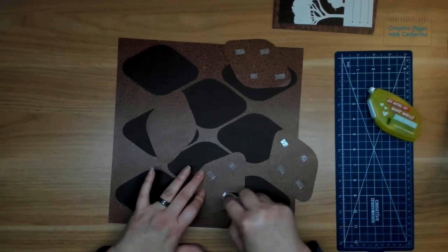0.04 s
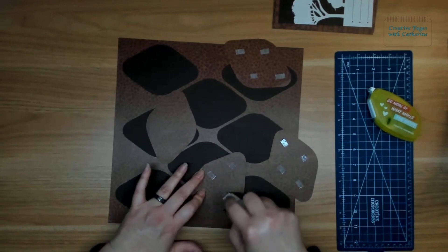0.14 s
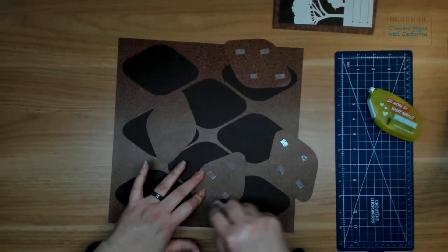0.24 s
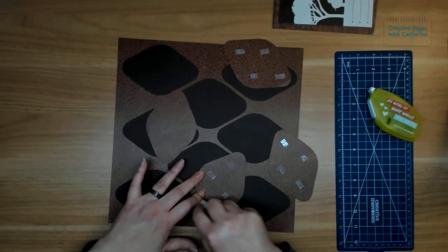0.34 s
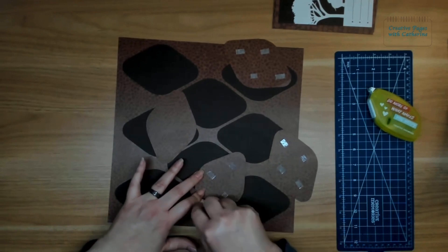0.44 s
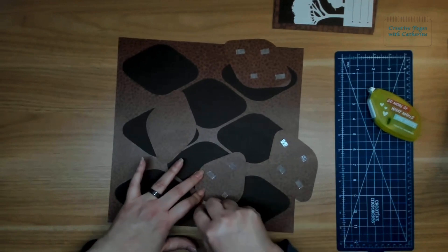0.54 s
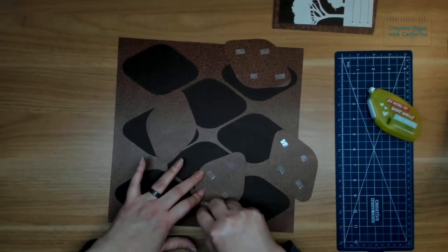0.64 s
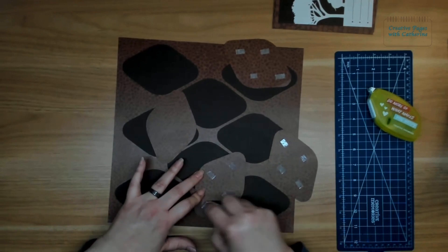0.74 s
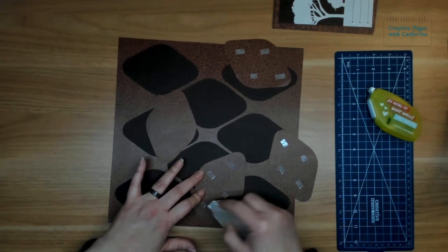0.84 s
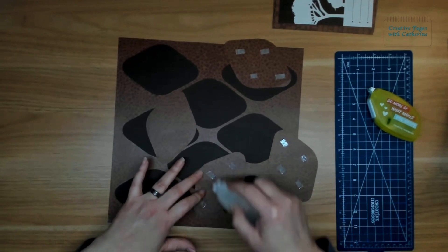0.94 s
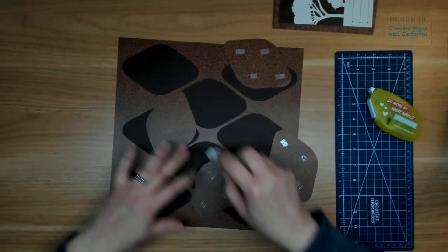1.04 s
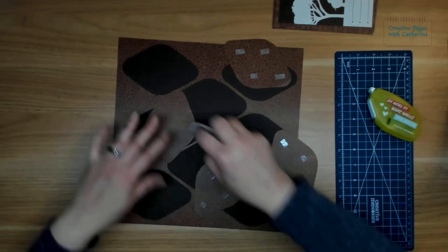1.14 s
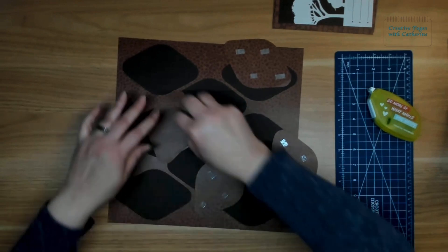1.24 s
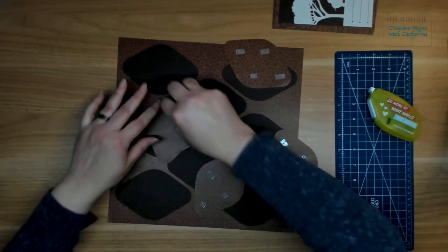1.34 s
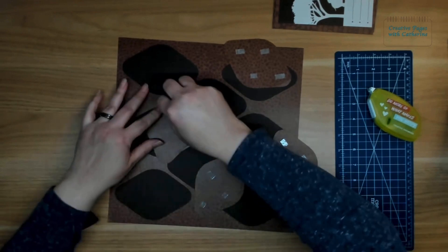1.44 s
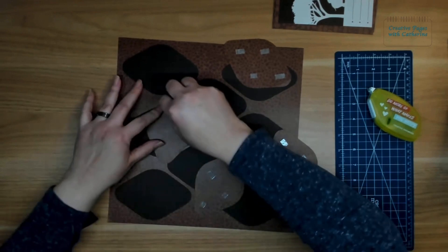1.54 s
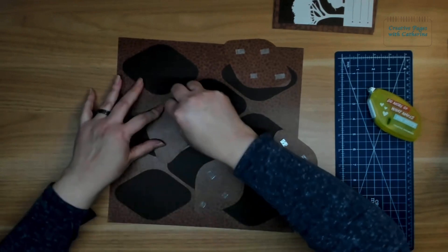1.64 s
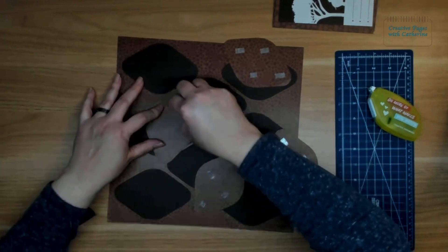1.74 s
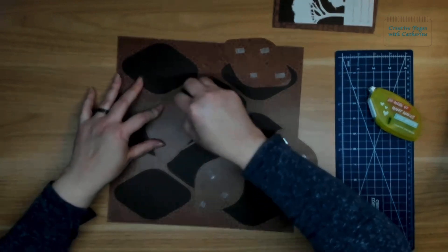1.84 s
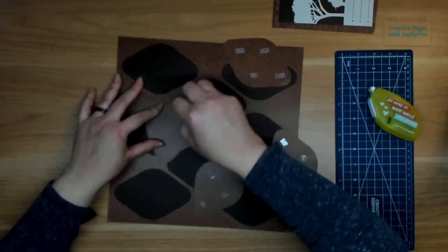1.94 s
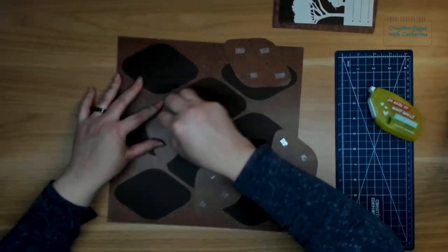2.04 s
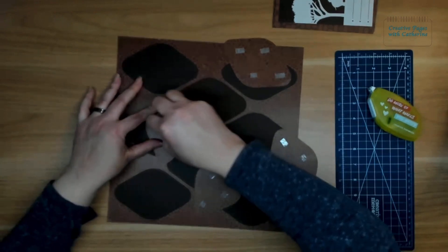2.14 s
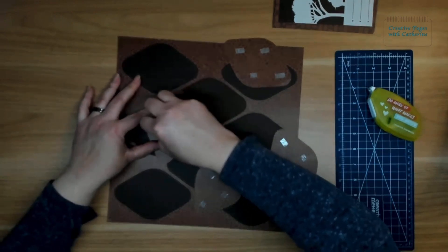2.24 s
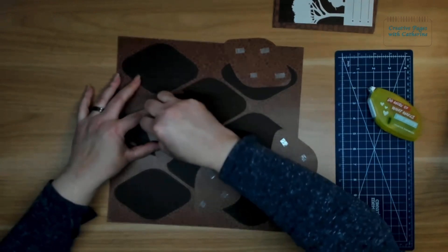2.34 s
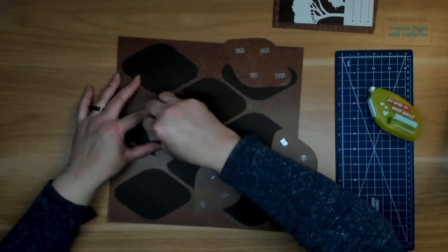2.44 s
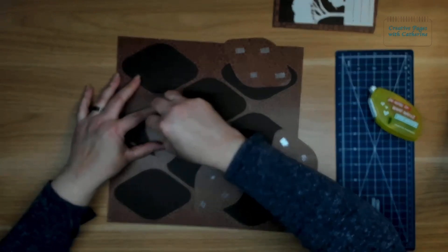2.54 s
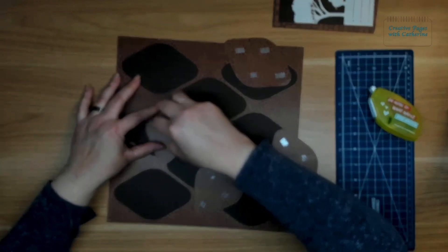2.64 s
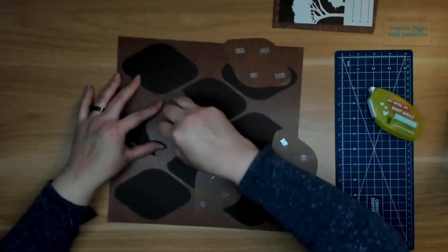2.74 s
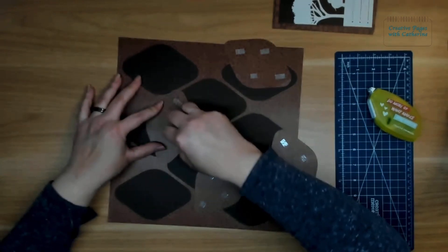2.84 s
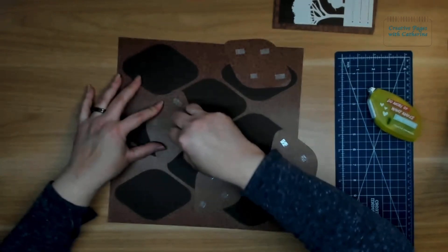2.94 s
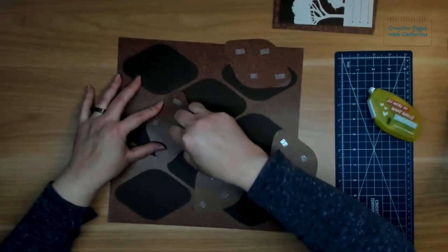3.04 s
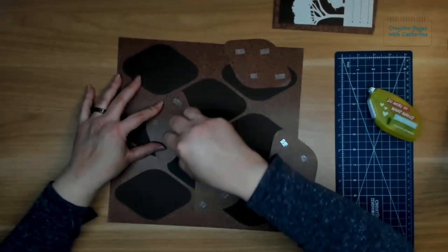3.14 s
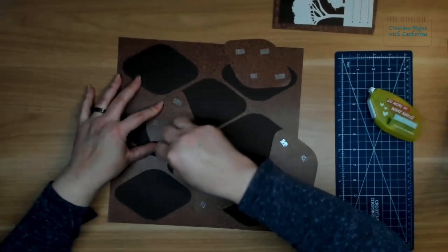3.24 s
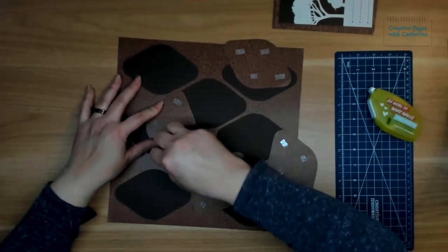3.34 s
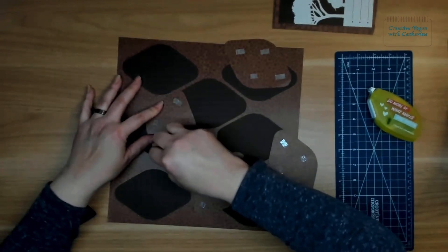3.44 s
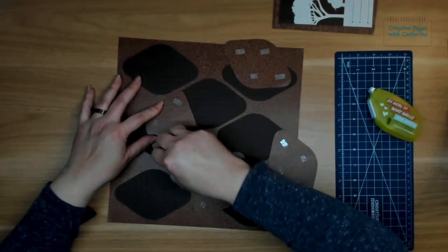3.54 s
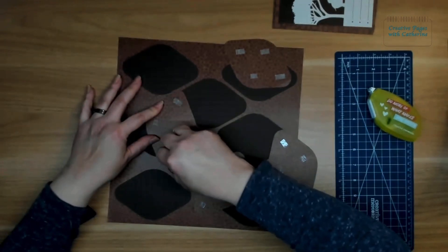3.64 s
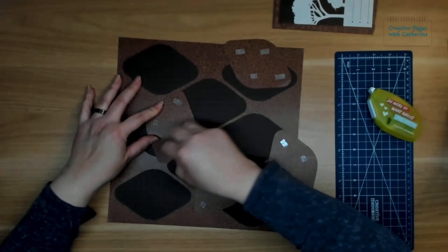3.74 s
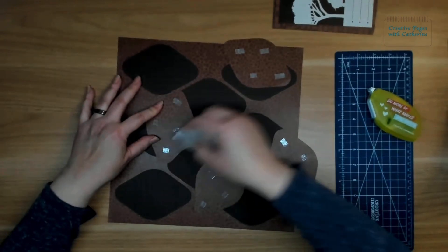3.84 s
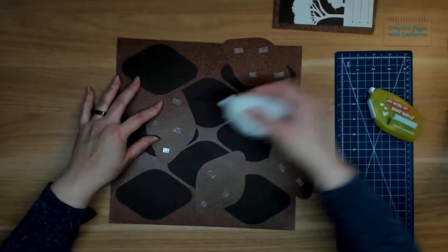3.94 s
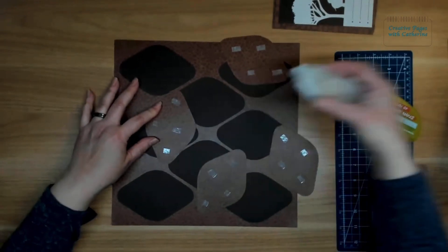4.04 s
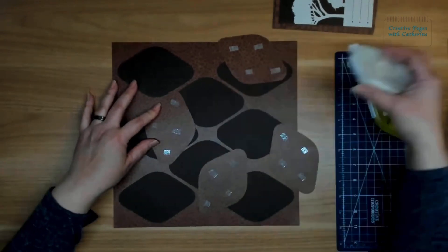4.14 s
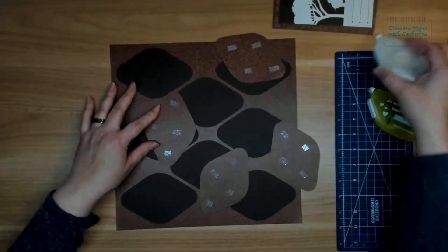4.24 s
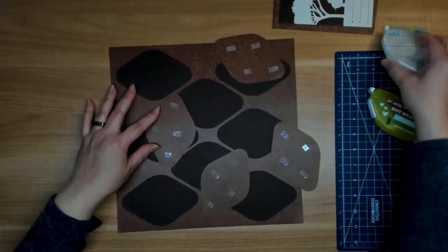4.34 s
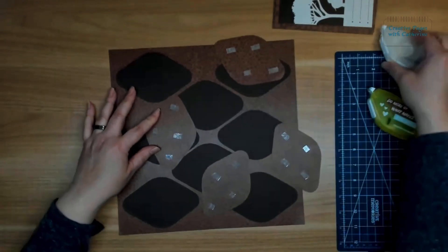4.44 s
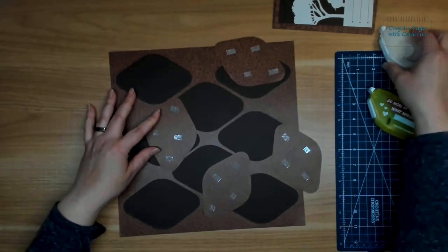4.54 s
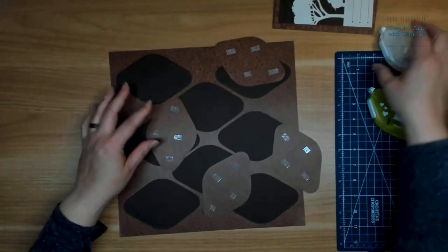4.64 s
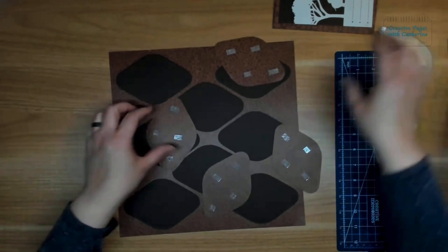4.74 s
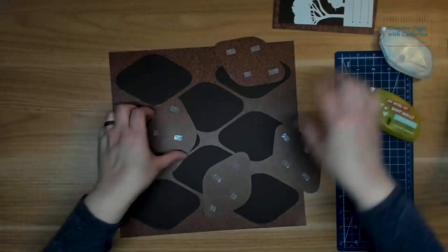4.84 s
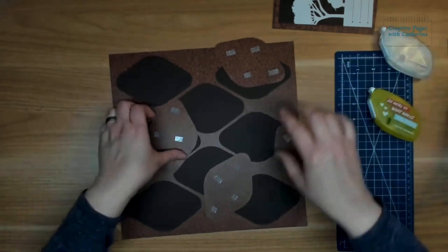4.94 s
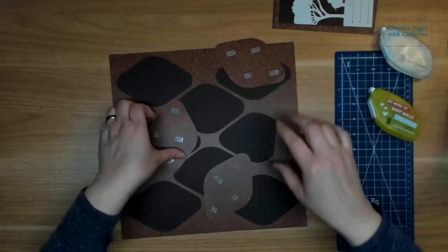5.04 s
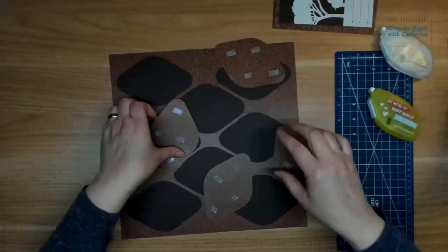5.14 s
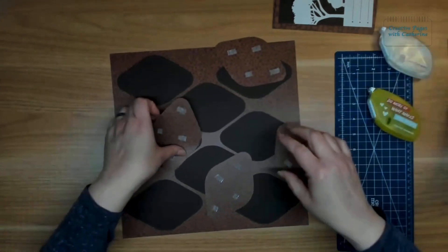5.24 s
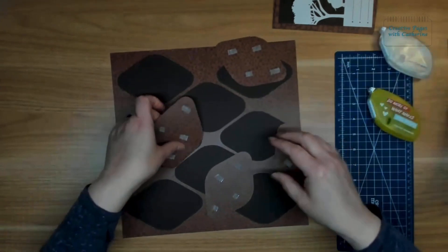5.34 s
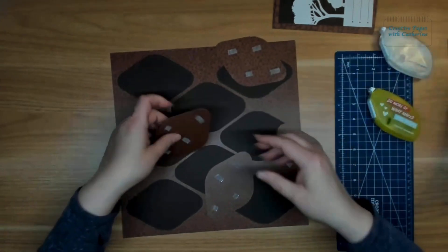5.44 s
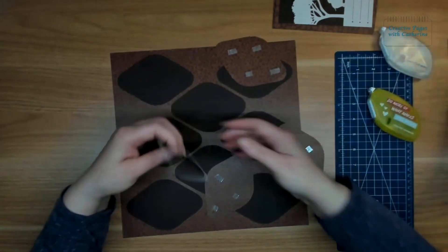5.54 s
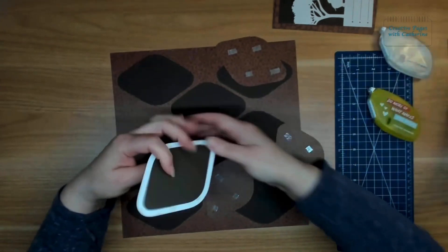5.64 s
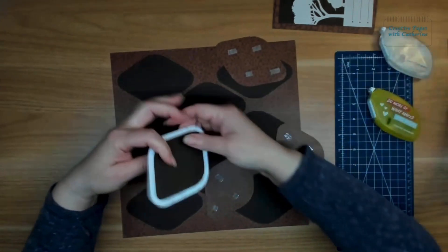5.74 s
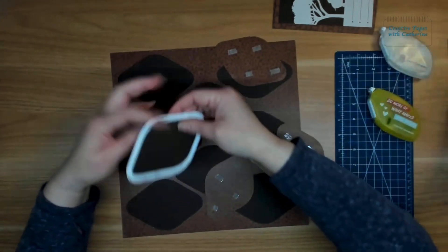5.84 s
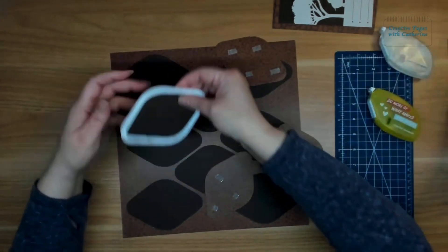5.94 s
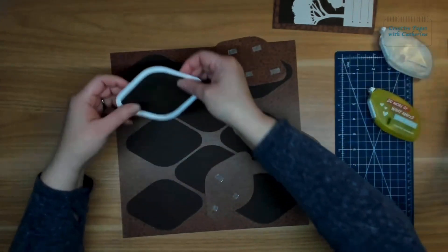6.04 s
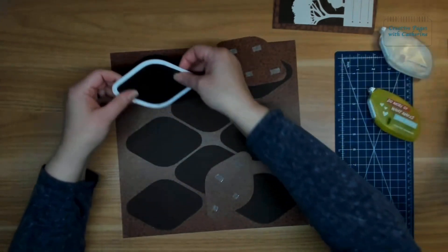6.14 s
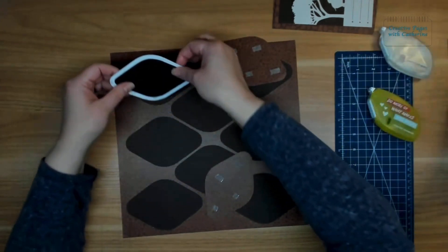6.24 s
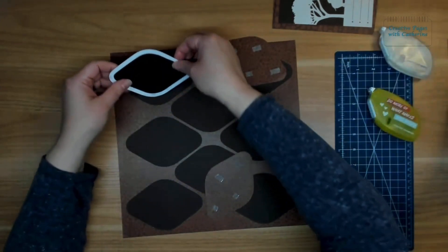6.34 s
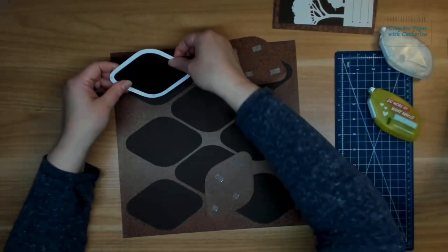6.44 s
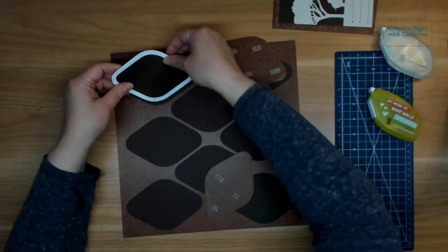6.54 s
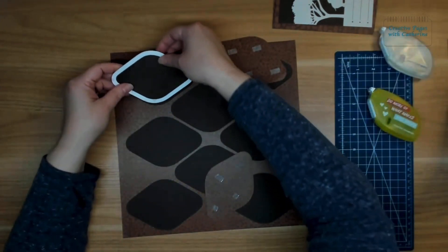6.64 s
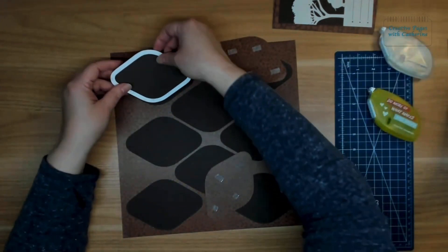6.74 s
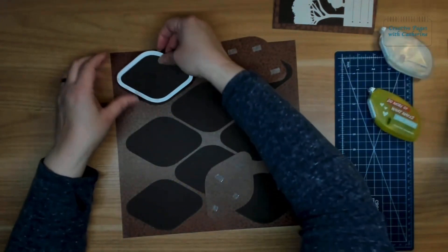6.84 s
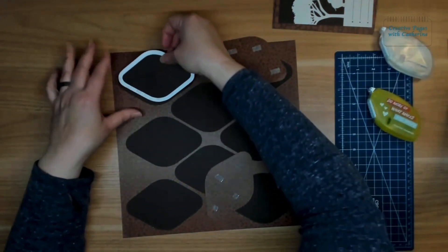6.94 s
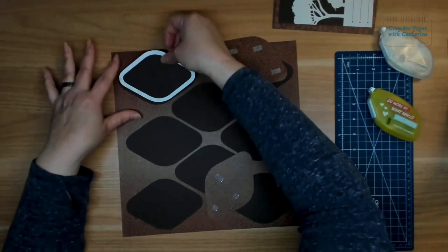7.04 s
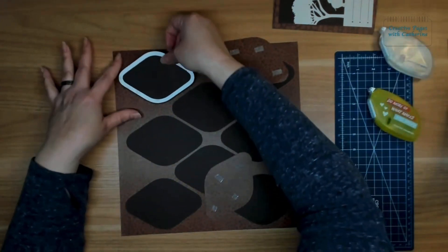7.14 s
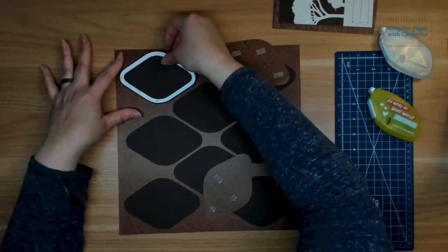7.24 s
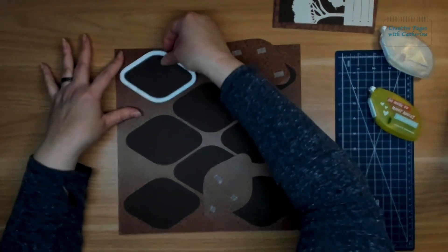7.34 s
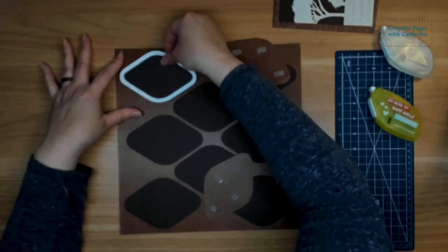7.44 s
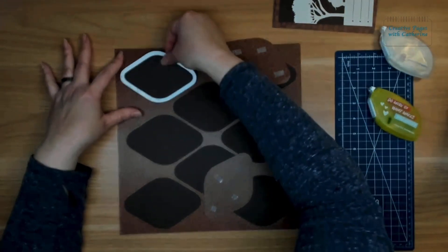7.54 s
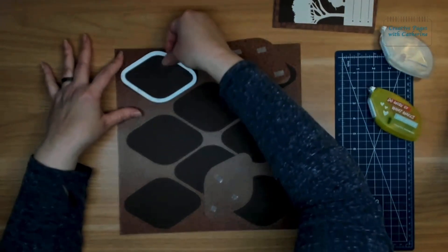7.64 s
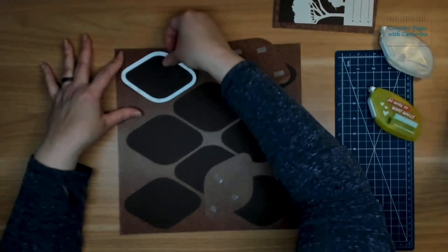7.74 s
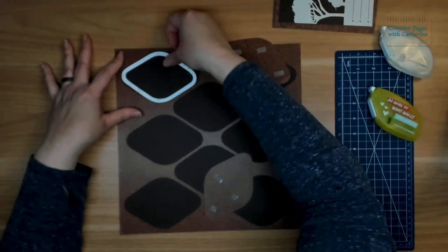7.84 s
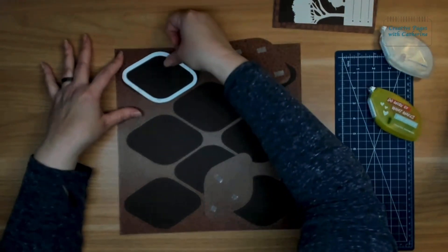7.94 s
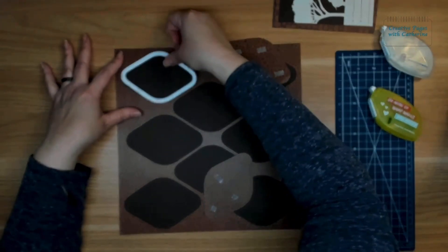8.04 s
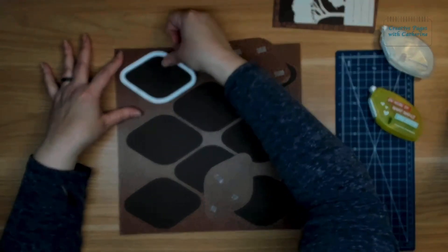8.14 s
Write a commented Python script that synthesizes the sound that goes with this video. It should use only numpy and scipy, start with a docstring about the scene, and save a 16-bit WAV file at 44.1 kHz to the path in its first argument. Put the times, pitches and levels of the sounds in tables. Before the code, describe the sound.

Brief grainy tape-pull rasps with tiny ratchet clicks and low table knocks, then a clattering put-down and a few crisp card ticks over soft hiss.

```python
"""A tape runner is pressed on card and pulled in short strokes on a hollow wooden table, then put aside.
Ratchet teeth, knocks and grainy peeling tape ring the modes of its plastic housing.
Each landing thumps the modes of the table top; sliding friction keeps them humming.
Card edges tick as decaying crackle bursts, and flexing card rustles as clumped grains in its own bands.
A background hiss of coloured noise lies beneath."""
import sys
import numpy as np
from scipy import signal
from scipy.fft import rfft, irfft, next_fast_len
from scipy.io import wavfile
from scipy.ndimage import uniform_filter1d

SR = 44100
rng = np.random.default_rng(int(sys.argv[2]) if len(sys.argv) > 2 else 0)


def dump_mix(stems):
    """Bounce the given channels to the path in sys.argv[1] as a 16-bit WAV at rate SR."""
    frames = np.atleast_2d(stems).T  # one column per channel
    limited = np.clip(frames, -1, 1)  # hard clip at full scale
    pcm = np.round(limited * 32767).astype(np.int16)
    wavfile.write(sys.argv[1], SR, pcm)


N = 361619

# table-top modes: f/Hz, level/dB, group (0 lower, 1 top, 2 upper)
TABLE_MODES = [(57.4, -11.5, 0), (98, -2.5, 0), (127.6, 2.5, 0), (178.2, 1.5, 1), (217.2, -16.5, 1),
               (299, -0.5, 2), (363, -3, 2), (460.4, -10.5, 2), (573, -19, 2)]
# pulls: t of full level/s, rise/s, hold/s, fall/s, peel/dB, treble/dB re peel, middle modes/dB re peel,
# low, middle, high modes/dB re tooth, roller drag/dB, its lower table modes/dB re top
PULLS = [(0.517, 0.046, 0.061, 0.054, -33, 5, 6.5, -3, -5, -6, -34, 0),
         (1.639, 0.13, 0.031, 0.091, -25.5, 0, 5, -12.5, -6, 0, -27.5, -9),
         (2.411, 0.059, 0.069, 0.095, -31, 2.5, -6, -0.5, -12, -14, -36.5, -4.5),
         (2.846, 0.043, 0.084, 0.047, -26, 0, -4, -6, -16, -2.5, -23.5, -15.5),
         (3.551, 0.042, 0.047, 0.055, -23.5, -2.5, 1.5, -8, -12, 0.5, -26.5, -8.5)]
# peeling tape spectrum: f/Hz, relative density/dB per Hz
PEEL_SPECTRUM = [(500, -30), (900, -38), (1800, -16), (3900, -14.5), (5500, -7.5), (7000, -5), (7800, -20),
                 (8300, -9.5), (12000, -13), (16000, -18.5)]


def amp(db):
    """dB to gain."""
    return 10 ** (np.asarray(db) / 20)


def rms_one(x):
    """Scale to rms 1."""
    return x / np.sqrt(np.mean(x ** 2) + 1e-20)


def coloured(spectrum):
    """Noise with the given spectrum, rms 1."""
    hz, db = np.transpose(spectrum)
    size = next_fast_len(N)
    grid_hz = np.maximum(np.fft.rfftfreq(size, 1 / SR), 1)
    gain = amp(np.interp(np.log(grid_hz), np.log(hz), db))
    return rms_one(irfft(rfft(rng.standard_normal(size)) * gain, size)[:N])


def flicker(cutoff_hz):
    """Low-passed noise, rms 1."""
    lowpass = signal.butter(2, cutoff_hz, fs=SR, output="sos")
    return rms_one(signal.sosfilt(lowpass, rng.standard_normal(N)))


def add(out, t_s, piece):
    """Mix a piece in at t_s."""
    i = round(t_s * SR)
    out[i:i + len(piece)] += piece[:N - i]


def resonance(x, hz, width_hz):
    """A ringing mode with steep skirts, which also lower the height of a click."""
    r, w = np.exp(-np.pi * width_hz / SR), 2 * np.pi * hz / SR
    skirt = signal.butter(2, [hz / 1.2, hz * 1.2], "band", fs=SR)
    ringing = signal.lfilter([.5, 0, -.5], [1, -2 * r * np.cos(w), r * r], x + 1e-18)
    return signal.lfilter(*skirt, ringing)


def swell(t_s, rise_s, hold_s, fall_s):
    """dB below the top of a gesture that rises up to t_s, holds and falls."""
    depth_db, bend = 31, 1.19  # drop over one rise or fall time; rounding
    t = np.arange(N) / SR
    away = np.maximum((t_s - t) / rise_s, (t - t_s - hold_s) / fall_s)
    return -depth_db * np.clip(away, 0, 9) ** bend


def gestures(rows):
    """Level of several gestures, and of a part that each holds in its own share."""
    levels = [amp(db + swell(*times)) for *times, db, _ in rows]
    return sum(levels), sum(level * amp(row[-1]) for level, row in zip(levels, rows))


def hiss():
    """Steady background hiss, wavering a little; its level rises by a few dB near each pull."""
    # noise spectrum: f/Hz, relative density/dB per Hz
    hiss_spectrum = [(20, -9), (55, -18), (85, -4), (185, -3.5), (260, -5), (300, -6.5), (400, -7.5),
                     (860, -10.5), (1230, -12.5), (6050, -19), (7800, -23), (8300, -14), (11600, -11.5),
                     (16000, -14.5)]
    # noise level before trim: t/s, level/dB
    hiss_level = [(0.0, -50.5), (0.25, -57), (4.7, -54.5), (6.4, -56.5), (8.2, -56.5)]
    bump_db, bump_s = 2.5, 0.16
    t = np.arange(N) / SR
    t_s, db = np.transpose(hiss_level)
    bumps = sum(np.exp(-((t - at - hold - fall) / bump_s) ** 2) for at, _, hold, fall, *_ in PULLS)
    level_db = np.interp(t, t_s, db) + bump_db * bumps + 3.0 + 0.57 * flicker(26)
    return amp(level_db) * coloured(hiss_spectrum)


def room(x):
    """A dense tail of dying noise, duller than the direct sound."""
    t60_s = 0.075
    t = np.arange(SR // 2) / SR
    tail = rng.standard_normal(len(t)) * amp(-60 * t / t60_s) * (t > .004)
    tail = signal.lfilter([.6], [1, -.4], tail)
    return signal.fftconvolve(x, tail / np.sqrt(np.sum(tail ** 2)))[:N]


def rustle():
    """Card flexing between the fingers: clumped tiny crackles ring the card's own bands."""
    # flexes: t of full level/s, rise/s, hold/s, fall/s, level/dB, low creak/dB re level
    flexes = [(5.372, 0.037, .005, 0.16, -59, -26), (5.585, 0.055, 0.016, 0.25, -57.5, -9.5),
              (5.8, 0.28, .05, 0.29, -60.5, -2), (6.11, .12, 0.018, 0.71, -71, 2.5),
              (7.21, 0.14, 0.055, .6, -74.5, 8.5), (7.7, 0.23, 0.026, 0.46, -72, -4)]
    level, creak = gestures(flexes)
    grains = rng.standard_normal(N) * amp(3.0 * flicker(40))
    high = rms_one(resonance(grains, 1686, 320.0) + amp(-6.0) * resonance(grains, 2940, 350.0))
    low = rms_one(resonance(grains, 538, 380.0) + amp(-4.5) * resonance(grains, 875, 270.0))
    return level * high + creak * low


def ticks():
    """Card edges: a sharp snap, then small crackles, in the card's band and across a broad range."""
    # ticks: t/s, level before trim/dB, centre f/Hz, width/octaves, rustle t60/s, rustle/dB re tick
    edge_ticks = [(3.322, -49, 2620, 0.22, 0.27, -4.5), (3.431, -49, 2580, 0.16, 0.25, -4),
                  (4.0814, -29.5, 2820, 1.4, 0.23, -7.5), (4.0975, -24, 2380, 1.07, 0.15, -6),
                  (4.162, -32, 3370, 0.7, 0.077, -15), (5.3722, -30.5, 2070, 0.67, 0.051, -2.5),
                  (5.4892, -42, 4270, 0.45, 0.41, -5.5), (5.573, -28, 1710, 1.03, 0.05, -5.5),
                  (5.774, -29, 1770, 1.2, 0.15, -14), (5.852, -40, 1480, 0.84, 0.24, -4.5),
                  (6.102, -28.5, 6940, 1.68, 0.24, -13.5), (6.138, -42, 1830, 1.5, 0.047, -3.5),
                  (6.36, -45, 1500, 0.8, 0.066, -4)]
    crack_db, crack_db_per_octave = -1, 18  # broad crack at 1.5 octaves; narrower ticks crack less
    out, t = np.zeros(N), np.arange(SR // 3) / SR
    noise = rng.standard_normal((len(edge_ticks), 2, len(t)))
    broad = signal.butter(1, [600, 8000], "band", fs=SR, output="sos")
    for (t_s, db, hz, octaves, t60_s, rustle_db), (fine, lumps) in zip(edge_ticks, noise):
        half = 2 ** (octaves / 2)
        band = signal.butter(2, [hz / half, hz * half], "band", fs=SR, output="sos")
        crackle = fine * amp(rms_one(uniform_filter1d(lumps, size=60)))
        snap = amp(-60 * t / 0.0022)
        decay = amp(rustle_db - 60 * t / t60_s)
        crack = amp(crack_db + crack_db_per_octave * (octaves - 1.5))
        colour = rms_one(signal.sosfilt(band, crackle))
        colour = colour + crack * rms_one(signal.sosfilt(broad, crackle))
        add(out, t_s, amp(db - 6.5) * colour * (snap + decay))
    return out


def drag():
    """Uneven friction of hand and roller keeps the table modes humming."""
    # hand or runner slides: t of full level/s, rise/s, hold/s, fall/s, level/dB, lower modes/dB re top
    slides = [(0.0, 0.022, .01, 0.082, -49.5, 1.5), (0.17, 0.074, 0.0081, 0.13, -46, -12),
              (0.77, 0.34, 0.014, 0.065, -65, 8), (1.4, 0.26, 0.036, 0.08, -58, -11),
              (1.776, 0.11, 0.0068, 0.033, -38, -7), (4.31, .15, 0.03, 0.21, -47.5, -17),
              (4.52, 0.075, 0.013, 0.046, -26.5, -19), (4.63, 0.07, 0.045, 0.036, -36, -7.5),
              (4.9, 0.043, 0.054, 0.085, -36.5, -20)]
    lag_s, stretch = 0.0064, 0.98  # the table answers the roller late
    rolls = [(t_s + lag_s, rise * stretch, hold, fall * stretch, db, low_db)
             for t_s, rise, hold, fall, *_, db, low_db in PULLS]
    level, low = gestures(list(slides) + rolls)
    group_level = (low, level, level * amp(-18.0))
    out = np.zeros(N)
    for hz, db, group in TABLE_MODES:
        hum = rms_one(resonance(rng.standard_normal(N), hz, 11.4))
        out += amp(db + 0.5) * hum * group_level[group]
    return out


def thumps():
    """Every table mode swells during the soft contact and dies away quickly, the upper ones sooner."""
    # soft blows: t/s, level before trim/dB, lower modes/dB re top, upper modes/dB re top, top-group t60/s
    blows = [(0.407, -13, -1.5, -27, 0.22), (0.983, -31, -14, -15, 0.14), (1.436, -17.5, -1.5, -28, 0.18),
             (1.76, -20.5, -13, -39, 0.095), (1.986, -36.5, -7.5, -13, 0.18), (2.258, -12, -6, -27, 0.15),
             (2.348, -26, -16, -20, 0.23), (2.608, -22, -11, -21, 0.17), (2.783, -2, -11.5, -21.5, 0.2),
             (3.051, -38, -5.5, -15, 0.17), (3.314, -31.5, -7, -13, 0.2), (3.42, -12, -5.5, -22.5, 0.15),
             (3.773, -30, -5, -12, 0.14), (4.384, -7.5, -15, -13.5, 0.35),
             (4.475, -3.5, -13.5, -9.5, 0.099), (4.618, -16, -13, -44, 0.15),
             (4.836, -7.5, -6.5, -14, 0.14), (4.926, -23, -7, -17, 0.11)]
    contact_ms = 11.7
    out, t = np.zeros(N), np.arange(SR // 2) / SR
    press = np.sin(np.pi / 2 * np.minimum(t * 1000 / contact_ms, 1)) ** 2
    phases = rng.uniform(-1.2, 1.0, (len(blows), len(TABLE_MODES)))
    for (t_s, db, low_db, upper_db, t60_s), phase in zip(blows, phases):
        modes = np.zeros(len(t))
        for (hz, level_db, group), p in zip(TABLE_MODES, phase):
            decay_db = -60 * t / t60_s * (.9, 1, 1.8)[group]
            level = amp(level_db + (low_db, 0, upper_db)[group] + decay_db)
            modes += level * np.sin(2 * np.pi * hz * t + p)
        add(out, t_s - .004, amp(db - 0.5) * press * modes)
    return out


def rattles():
    """Force on each housing group: a snap within a quickly swelling chatter of loose parts."""
    # runner lands, lifts or rattles: t/s, low modes/dB, other modes/dB, their centre f/Hz,
    # rattle t60/s (low modes die sooner), snap/dB re mode level
    knocks = [(0.002, -36, -42.5, 3600, 0.071, -12), (0.087, -60, -45.5, 2800, 0.097, -11),
              (0.109, -38, -38.5, 3040, 0.11, 9), (0.399, -40, -50, 1700, 0.21, 8),
              (0.727, -25, -31.5, 3730, 0.11, 0), (0.732, -22, -29.5, 1500, 0.045, 11.5),
              (1.856, -41.5, -46, 4600, 0.087, 2), (1.874, -42, -46, 2100, 0.084, -1),
              (2.595, -46, -43.5, 3760, 0.11, 0), (2.774, -45, -39, 1700, 0.29, -7),
              (3.045, -38, -32, 2500, 0.12, 7.5), (3.053, -34.5, -36, 2400, 0.093, 7),
              (3.422, -30, -52, 2800, 0.094, 3), (3.708, -62, -56, 6070, 0.32, -10),
              (3.755, -36, -39.5, 2480, 0.09, -4), (3.762, -33.5, -43, 4150, 0.097, 10.5),
              (4.377, -27.5, -24.5, 1300, 0.12, -11), (4.386, -28, -33, 1500, 0.29, -5),
              (4.487, -27, -30.5, 1460, 0.089, -5), (4.502, -35, -40.5, 1300, 0.14, -4)]
    # centres of the mode groups above the low one: f/Hz
    group_hz = [1350, 2380, 3160, 5000]
    loss_db_per_octave, low_damping = 14.5, 1.48
    force, t = np.zeros((5, N)), np.arange(SR // 4) / SR
    noise = rng.standard_normal((len(knocks), len(t)))
    for (t_s, low_db, others_db, hz, t60_s, snap_db), chatter in zip(knocks, noise):
        octaves_off = np.abs(np.log2(np.divide(group_hz, hz)))
        group_db = [low_db, *(others_db - loss_db_per_octave * octaves_off)]
        burst = amp(-15.0) * (1 - np.exp(-t / 0.0023)) * chatter ** 2 * np.sign(chatter)
        for row, db, damping in zip(force, group_db, (low_damping, 1, 1, 1, 1)):
            add(row, t_s - .002, amp(db - 60 * damping * t / t60_s) * burst)
            add(row, t_s, amp([db + snap_db]))
    return force


def snaps(clicks):
    """Each click becomes a crack of bright noise a few ms long."""
    t = np.arange(SR // 50) / SR
    shape = signal.fftconvolve(np.abs(clicks), amp(-60 * t / 0.0032))[:N]
    return shape * coloured(PEEL_SPECTRUM)


def runner():
    """Ratchet teeth, rattles and grainy peel excite the housing modes; some peel is heard directly."""
    # ratchet teeth: t/s, level/dB before mode trims, brightness/dB
    teeth_table = [(0.497, -33, -3), (0.503, -26, 0), (0.514, -18, -1.5), (0.523, -19.5, -2),
                   (0.527, -14.5, 0), (0.544, -16, 1), (0.551, -19, -1.5), (0.561, -14, 2), (0.57, -26, 7),
                   (0.578, -23.5, -3), (1.568, -20.5, -0.5), (1.591, -15.5, -1), (1.607, -25, 0),
                   (1.612, -16.5, -1), (1.63, -13, -0.5), (1.641, -15.5, -4), (1.657, -21, 7),
                   (1.668, -20.5, 0), (1.681, -18, 0), (1.695, -15.5, -1), (2.355, -31, -0.5),
                   (2.391, -29, 1), (2.409, -26, -2), (2.427, -25, 2), (2.443, -17.5, 3), (2.461, -10, 0),
                   (2.472, -21, 1), (2.507, -26, -2), (2.516, -27, -2), (2.833, -21, -5), (2.841, -12.5, 1),
                   (2.85, -19, 2), (2.862, -15, 2), (2.872, -19, 2), (2.884, -18, 0), (2.904, -16, -1),
                   (2.914, -12, 0.5), (2.932, -20, 0), (3.53, -20, -2), (3.542, -18, 0), (3.551, -19, 1),
                   (3.562, -9.5, 0.5), (3.568, -14, 1), (3.578, -21, 3), (3.587, -14, -1),
                   (3.603, -14.5, -1)]
    # housing modes before group trims: f/Hz, width/Hz, pressed and pulled/dB, knocked free/dB,
    # group (0 low, 1 low-middle, 2 middle, 3 upper-middle, 4 high)
    housing = [(922, 310, -5, -2.5, 0), (1008, 104, 0.5, 0, 0), (1023, 140, -17.5, -5.5, 0),
               (1219, 266, -0.5, 2, 1), (1387, 330, -16.5, -3.5, 1), (1657, 380, -7, -18, 1),
               (2290, 126, -5.5, -10.5, 2), (2438, 150, -10, -2.5, 2), (3176, 143, -3, -4.5, 3),
               (4337, 143, -16, -4.5, 4), (4990, 124, -8.5, -10.5, 4), (5500, 190, -4.5, -13, 4),
               (5750, 780, -9, -8, 4), (6530, 700, -24, -21.5, 4)]
    treble_rise, treble_fall = 0.97, 1.57  # times the peel's own
    slow_dulling, tooth_spread_db = 0.45, 1.06  # share of pull swell in a tooth's upper modes; chance
    t = np.arange(N) / SR
    t_s, tooth_db, bright_db = np.transpose(teeth_table)
    at = np.round(t_s * SR).astype(int)
    pulls = np.array(PULLS)

    swells_db = [swell(*p[:4]) for p in pulls]
    level = sum(amp(p[4] + db) for p, db in zip(pulls, swells_db))
    treble = sum(amp(p[4] + p[5] + swell(p[0], p[1] * treble_rise, p[2], p[3] * treble_fall))
                 for p in pulls)
    treble = treble / (level + 1e-9)

    # tooth levels by band, from the pull each tooth belongs to
    dull_db = slow_dulling * np.max([db[at] for db in swells_db], axis=0)
    pull_index = np.searchsorted(pulls[:, 0] - 2 * pulls[:, 1], t_s) - 1
    shares_db = pulls[pull_index, 7:10] + rng.normal(0, tooth_spread_db, (len(t_s), 3))
    bands_db = tooth_db + shares_db.T + np.outer([0, 1, 1], dull_db) + np.outer([-1, 0, 1], bright_db)
    low_db, middle_db, high_db = bands_db
    group_tooth_db = (low_db - 1.5, low_db - 23.0, middle_db - 0.5, middle_db, high_db + 0.5)
    spread_db = rng.normal(0, 1.4, (len(t_s), len(housing)))
    late_s = rng.uniform(0, .0015, (len(t_s), len(housing)))  # a tooth scrapes over its pawl

    # the tape lets go in a rush after each tooth
    last = np.maximum(np.searchsorted(t_s, t) - 1, 0)
    since_s = np.abs(t - t_s[last])
    level = (level + 1e-9) * amp(10.2 * np.exp(-since_s / 0.00073) - 4.5)
    grains = rng.standard_normal((2, N)) * amp(3.8 * flicker(250))

    # a looser grip frees the middle modes
    hold_ends_s = pulls[:, :3:2].cumsum(axis=1).ravel()
    grip = amp(np.interp(t, hold_ends_s, np.repeat(pulls[:, 6], repeats=2)))
    group_peel = (1, 1, grip, grip, treble)

    force = rattles()
    out = level * treble * amp(-6.5) * coloured(PEEL_SPECTRUM) * amp(2.4 * flicker(110))
    for k, (hz, width_hz, db, free_db, group) in enumerate(housing):
        clicks = force[group] * amp(free_db + (-8.0, 2.0, -3.0, -1.5, 3.0)[group])
        hits = np.round((t_s + late_s[:, k]) * SR).astype(int)
        clicks[hits] += amp(db + group_tooth_db[group] + spread_db[:, k])
        peel_gain = amp(db + (-5.5, -12.0, -20.0, -10.0, -29.5)[group])
        peel = rms_one(resonance(grains[k % 2], hz, width_hz)) * level * group_peel[group] * peel_gain
        out += resonance(clicks, hz, width_hz) + peel

    teeth = np.zeros(N)
    teeth[at] = amp(high_db - 26.0)
    broad = signal.butter(2, [600, 2700], "band", fs=SR, output="sos")
    clatter = signal.sosfilt(broad, force[1])  # a knock also clatters broadly
    return out + amp(-5.0) * clatter + snaps(teeth + amp(-10.0) * force[4])


def scene():
    """Air-borne sounds get the room; table sound comes through the microphone stand, short of deep bass."""
    room_db = -8
    close = runner() + ticks() + rustle()
    stand = signal.butter(2, 60.0, "high", fs=SR, output="sos")
    table = signal.sosfilt(stand, thumps() + drag())
    return (close + amp(room_db) * room(close) + table + hiss())[None]


def record(dry):
    """A steep low-pass cuts the top."""
    cutoff_hz = 15830
    return signal.sosfilt(signal.ellip(12, .5, 80, cutoff_hz, fs=SR, output="sos"), dry)


dry = scene()
out = record(dry)
dump_mix(out)
```